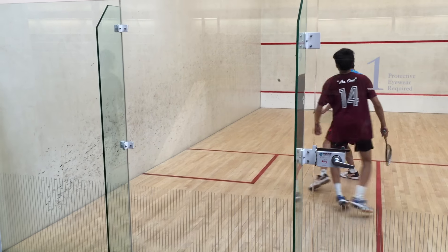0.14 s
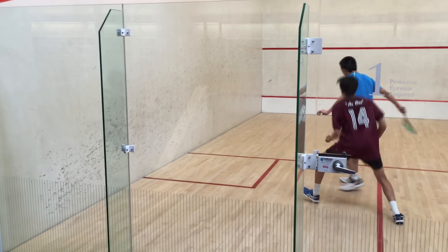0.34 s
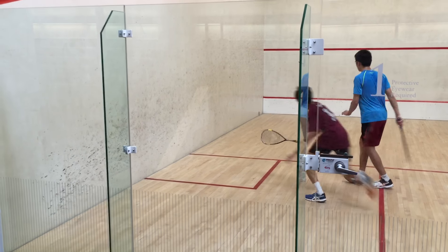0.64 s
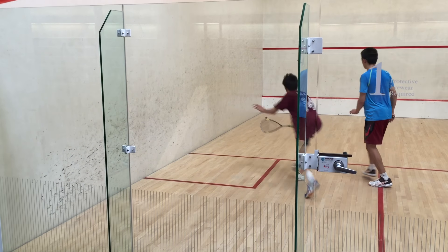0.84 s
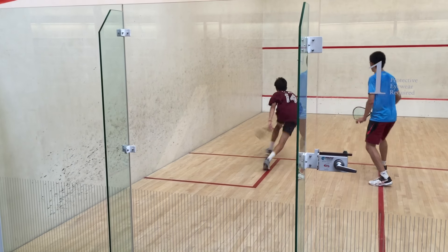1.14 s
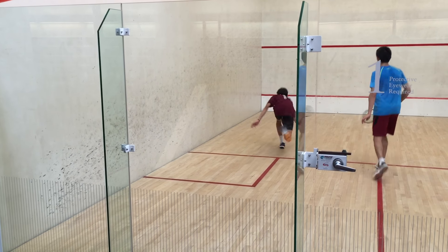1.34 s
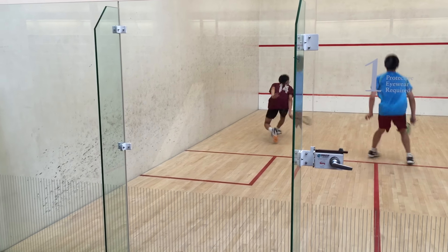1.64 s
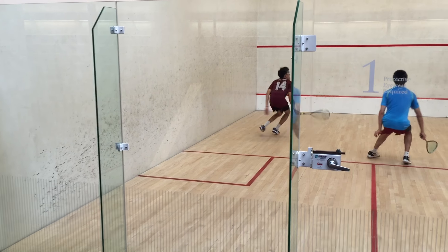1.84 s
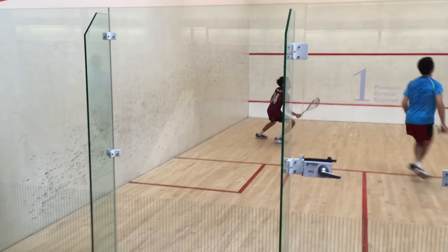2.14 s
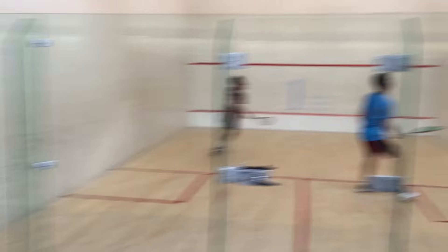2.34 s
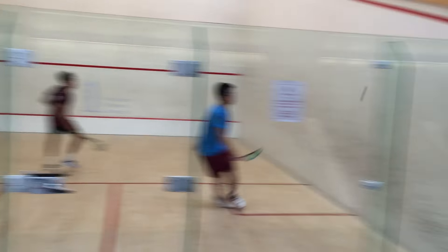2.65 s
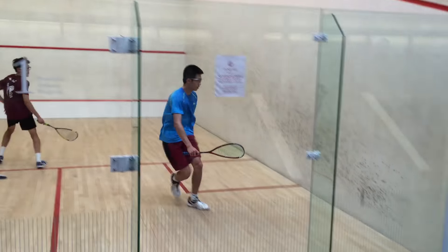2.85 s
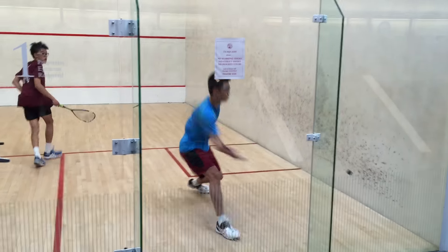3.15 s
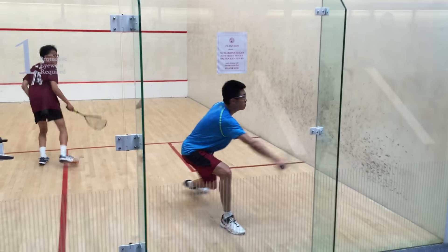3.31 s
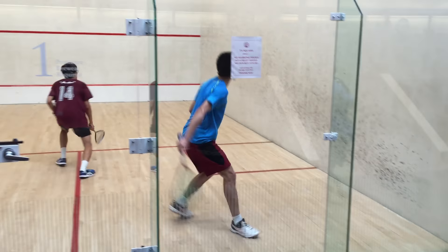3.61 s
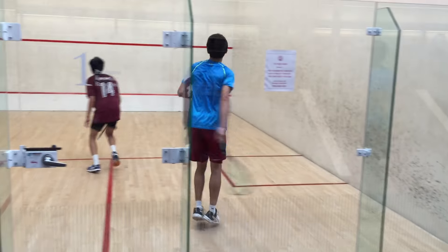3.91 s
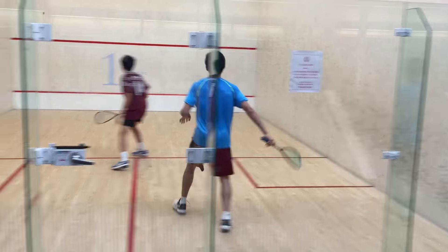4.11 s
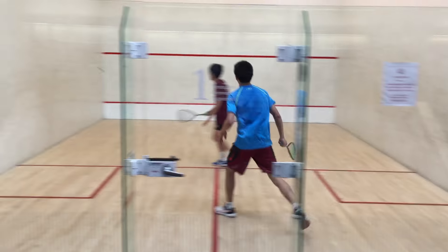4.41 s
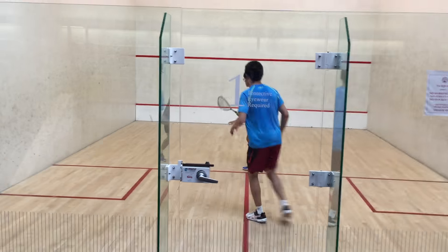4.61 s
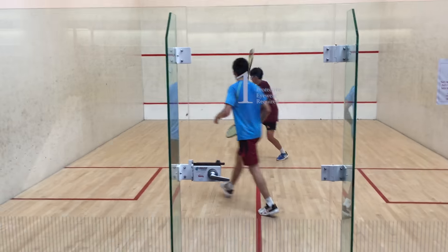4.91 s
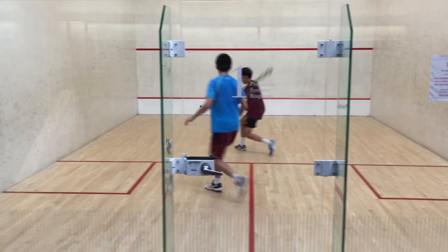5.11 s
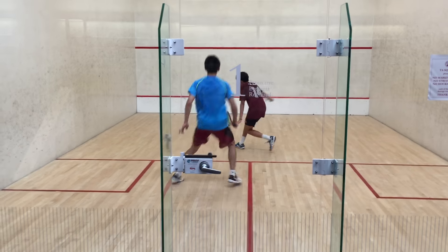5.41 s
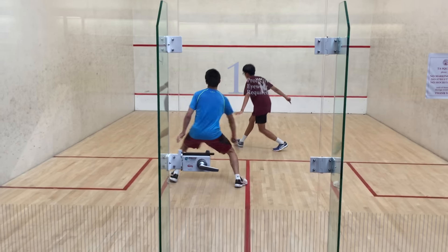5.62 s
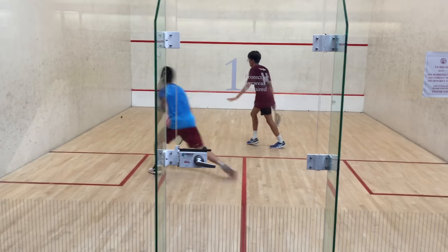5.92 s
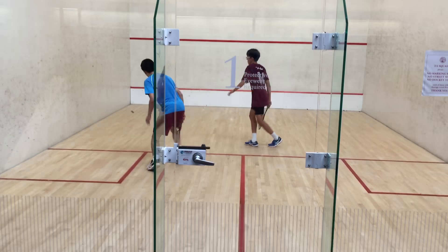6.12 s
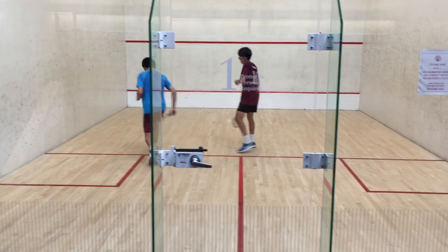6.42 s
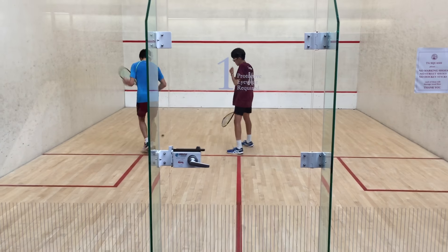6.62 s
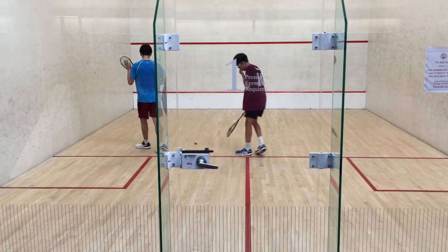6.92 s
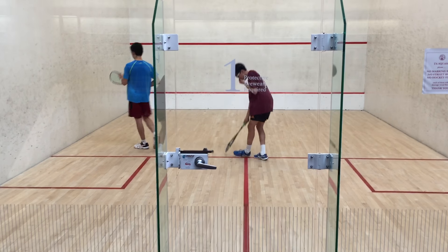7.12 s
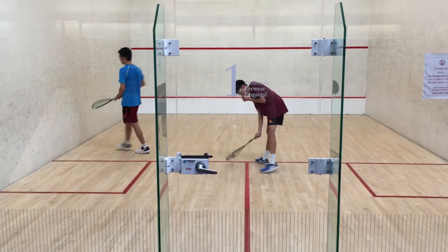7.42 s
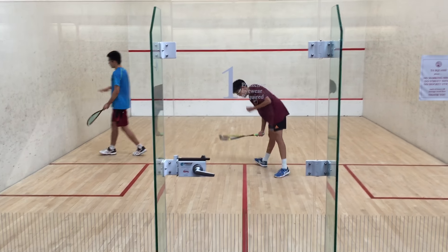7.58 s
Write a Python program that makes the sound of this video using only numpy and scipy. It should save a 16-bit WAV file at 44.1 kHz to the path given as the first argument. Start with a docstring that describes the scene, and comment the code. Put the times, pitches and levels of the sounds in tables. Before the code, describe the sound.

A short squash rally: four racquet hits and several hard wall smacks, each trailing nearly two seconds of echo. Between them come high, rough sneaker squeaks, quick light footfalls and deep floor thuds. A heavy lunge ends the play, steps calm down, faint scuffs pass, and a racquet taps the boards with a brief ring. The microphone stands outside the glass, with soft low air noise beneath.

```python
"""Racquets strike a squash ball and it smacks the front wall, heard from behind the glass back wall.
Each blow is a short coloured pulse with a brief ring, followed by the echoes of a hard court.
Rubber soles squeak as wavering tones with overtones; feet thud as low tones with rumbling boards.
Light scuffs are brief hisses, and a racquet's frame rings near the end as it scoops up the ball.
Ventilation murmurs underneath as steady coloured noise."""
import sys
import numpy as np
from scipy import signal
from scipy.fft import rfft, irfft, next_fast_len
from scipy.io import wavfile
from scipy.ndimage import map_coordinates

SR = 44100
rng = np.random.default_rng(int(sys.argv[2]) if len(sys.argv) > 2 else 0)


def inscribe(sig):
    """Save sig as 16-bit PCM at rate SR to the path in sys.argv[1].

    A 1-D sig is mono; a 2-D sig holds one channel per row.
    Samples are clipped to [-1, 1] before scaling.
    """
    pcm = np.round(np.clip(np.atleast_2d(sig).T, -1, 1) * 32767)
    wavfile.write(sys.argv[1], SR, pcm.astype(np.int16))


N = 341775  # length in samples


def amp(db):
    """Turn decibels into a plain multiplier."""
    return 10 ** (np.asarray(db) / 20)


def unit(x):
    """Scale a sound to an average (rms) strength of 1."""
    return x / np.sqrt(np.mean(x ** 2) + 1e-20)


def along(points, hz):
    """Read a (frequency, value) curve, with frequency spaced in octaves as the ear hears it."""
    frequencies, values = np.transpose(points)
    return np.interp(np.log(hz + 1), np.log(frequencies), values)


def clock(length):
    """The time in seconds of every sample."""
    return np.arange(int(length * SR)) / SR


def add(track, s, x):
    """Mix x into the track at time s."""
    start = max(0, round(s * SR))
    track[start:start + len(x)] += x[:max(0, N - start)]


def wobble(t, rate):
    """A smooth random curve with this many random points a second."""
    return map_coordinates(rng.standard_normal(512), [t * rate], mode="wrap")


def noise(spectrum, size):
    """Random hiss, coloured by a spectrum and scaled to strength 1."""
    hz = np.fft.rfftfreq(size, 1 / SR)
    coloured = rfft(rng.standard_normal(size)) * amp(along(spectrum, hz))
    return unit(irfft(coloured, size))


def blow(spectrum, tilt_db=0, thump_db=0, thump_hz=480, size=4096):
    """A knock: one pulse of energy 1 with the given colour, its energy packed towards the start."""
    hz = np.fft.rfftfreq(size, 1 / SR)
    tilt = tilt_db * np.log2(hz / 1000 + 0.081)
    thump = thump_db / (1 + (hz / thump_hz) ** 4)
    # folding the cepstrum forward in time keeps the colour but lets nothing sound before the hit
    cepstrum = irfft(np.log(amp(along(spectrum, hz) + tilt + thump)))
    cepstrum[1:size // 2] *= 2
    cepstrum[size // 2 + 1:] = 0
    pulse = irfft(np.exp(rfft(cepstrum)))
    return pulse / np.linalg.norm(pulse)


def ringing(hz, t60, size=4096):
    """One pure tone of energy 1 that dies away by 60 dB in t60 seconds."""
    t = np.arange(size) / SR
    mode = np.sin(2 * np.pi * hz * t) * 10 ** (-3 * t / t60)
    return mode / np.linalg.norm(mode)


# how long the court's echo lasts: (frequency [Hz], time to fall by 60 dB [s])
ECHO_TIMES = [(60, 0.89), (130, 2.3), (260, 1.83), (700, 1.67), (1900, 1.794), (4300, 1.757), (6500, 1.23),
              (9000, 0.99), (15000, 0.39)]
ROUND_TRIP = 0.0614  # s, from the back glass to the front wall and back


def court(x, direct_db, build=0.013, merge=0.06, early_db=-10, flutter=1.0, smear=0.011,
          scatter=0.0012, contact=0.0029, shade_hz=7000):
    """Sound from one spot arrives directly, then by scattered walls, then as a tail sloshing end to end."""
    t = clock(2.4)
    hz, frames, z = signal.stft(rng.standard_normal(len(t)), SR, nperseg=256)
    fade = 10 ** (-3 * frames / along(ECHO_TIMES, hz)[:, None])
    tail = signal.istft(z * fade, SR, nperseg=256)[1][:len(t)]
    # each return of the wavefront along the court is weaker than the one before
    returns = 0
    for k in range(1, 4):
        since_return = t - k * ROUND_TRIP - smear / 2
        returns = returns + flutter / k ** 2 * np.exp(-(since_return / smear) ** 2)
    late = amp(-39.0) * tail * (1 - np.exp(-t / build)) * (1 + returns)
    # side walls, floor and glass each send short smeared copies
    when, strength = rng.random(24), rng.exponential(size=24)
    delay = 0.0027 + 2 * merge * when
    arrivals = np.bincount((delay * SR).astype(int), strength * np.exp(-delay / merge), len(t))
    smeared = signal.lfilter([1], [1, -np.exp(-1 / (scatter * SR))], arrivals)
    early = smeared * rng.standard_normal(len(t))
    direct = np.exp(-t / contact) * rng.standard_normal(len(t))
    first = amp(early_db) * early / np.linalg.norm(early)
    first += amp(direct_db) * direct / np.linalg.norm(direct)
    # the glass wall shades the treble of these first arrivals
    shaded = signal.lfilter(*signal.butter(1, shade_hz, fs=SR), first)
    return signal.fftconvolve(x, late + shaded)


# colour of the moving air: (frequency [Hz], level [dB])
AIR_COLOUR = [(25, -16), (60, -3.5), (110, 8), (250, -4.5), (500, -29.5), (1500, -28.5), (4000, -32),
              (8000, -41), (15500, -45)]


def ventilation():
    """Moving air makes a steady random murmur, strongest in the bass."""
    return amp(-53.0) * noise(AIR_COLOUR, N)


# colour of rubber rubbing on the boards: (frequency [Hz], level [dB])
RUB_COLOUR = [(300, 4), (1200, 8), (3000, 0), (6000, 7.5), (9000, -3), (15000, -13)]
SAG = 0.033  # share of its pitch that a squeak loses as the sole slows


def squeak(length, hz, rough, overtone_db, waver=0.029, rasp=0.0794, flutter_db=3, fall_db=9,
           grit=0.65, skirt=0.1):
    """Rubber sticks and slips thousands of times a second; uneven grip roughens pitch and strength."""
    t = clock(length)
    glide = hz * (1 + SAG * (0.5 - t / length))
    slow_waver = waver * np.sqrt(rough) * wobble(t, 222.6)
    fast_rasp = rasp * rough * wobble(t, 1102.0)
    pitch = glide * (1 + slow_waver + fast_rasp)
    phase = 2 * np.pi * np.cumsum(pitch) / SR
    # sharp releases make overtones, which come and go with the grip
    overtones = 0
    for k in range(2, 5):
        if k * hz < SR / 2:
            level = amp(overtone_db - fall_db * (k - 2.5)) * (1 + 0.12 * wobble(t, 1380))
            overtones = overtones + level * np.sin(k * phase)
    chatter = 1 + grit * rough * wobble(t, 1195) + skirt * wobble(t, 2600)
    grip = signal.windows.tukey(len(t), 0.5) * amp(flutter_db * wobble(t, 136.5))
    rub = amp(-17.0) * rough * noise(RUB_COLOUR, len(t))
    return unit(((np.sin(phase) + overtones) * chatter + rub) * grip)


# soles slipping: (time of the slide [s], lead of the first catch [s], length [s], pitch [Hz],
# level [dB], roughness [0-1], overtones [dB])
SOLE_SLIPS = [ (0, 0, 0.017, 3734, -33.5, 0.78, -23.5), (0.12, 0.053, 0.032, 4000, -30, 0.71, -15),
              (0.118, 0.031, 0.032, 3240, -33, 0.52, -11), (0.414, 0.0028, 0.026, 4310, -34.5, .25, -4),
              (0.437, 0.041, 0.054, 4714, -27.5, 0.23, -14.5), (0.704, 0, .13, 3154, -39, 0.27, -23),
              (0.758, 0.004, .04, 5304, -40.5, .4, -25), (1.83, .035, 0.034, 4297, -27.5, 0.49, -16.5),
              (1.864, 0.023, 0.057, 3425, -28, 0.51, -14.5), (2.131, 0.0016, 0.027, 4880, -32.5, 0.35, -10),
              (2.987, 0.045, 0.038, 3228, -30, .85, -9.5), (2.998, 0.04, 0.032, 5120, -31, 0.38, -15),
              (3.109, 0, 0.12, 5135, -31.5, 0.53, -14.5), (3.113, 0.023, 0.1, 4555, -35, 0.35, -6),
              (3.58, 0.052, 0.0665, 4852, -26, 0.27, -14), (3.6, 0.0029, 0.057, 4250, -41.5, .35, -8),
              (4.259, 0.022, 0.061, 4075, -23, .28, -15), (5.676, .02, .11, 3270, -40, 0.48, -20),
              (5.951, .021, 0.079, 4162, -29.5, 0.15, -18), (5.972, 0, 0.079, 4520, -36.5, 0.49, -16.5),
              (6.637, 0, .059, 4502, -40.5, 0.31, -12), (7.705, 0.009, 0.069, 4880, -52, 0.24, -1)]
CATCH_S, CATCH_DB = 0.0211, -3.5  # chirp as the sole first grips: length, level against the slide


def squeaks():
    """A braking sole catches with a short chirp, then slides."""
    out = np.zeros(N)
    for s, lead, length, hz, db, rough, overtone_db in SOLE_SLIPS:
        catch = (s - lead, CATCH_S, db + CATCH_DB)
        slide = (s, length, db)
        for start, span, level_db in [catch, slide]:
            slip = squeak(span, hz, rough, overtone_db)
            heard = court(slip, direct_db=-6.5, build=0.0073, early_db=-14, flutter=0.047)
            add(out, start, amp(level_db) * heard)
    return out


# colour of a sole slapping the boards: (frequency [Hz], level [dB])
SOLE_COLOUR = [(150, 6), (380, -6), (620, -9), (1150, -8), (2500, -15.5), (6000, -29), (15000, -63)]


def footfall(hz, slap_db, ring=0.069, boards_t60=0.33, boards_db=-2, near_db=-5, room_db=-7):
    """A foot pushes the sprung floor into a low tone, the boards shudder, and the sole slaps."""
    t = clock(0.31)
    push = np.sin(2 * np.pi * hz * t) * 10 ** (-3 * t / ring)
    # rumble centred on the boards' own pitch
    rumble = [(hz / 4, -34), (hz * 0.73, -3), (hz, 0), (hz * 1.54, -6), (hz * 2.61, -26), (hz * 20, -80)]
    shudder = amp(boards_db) * noise(rumble, len(t)) * 10 ** (-3 * t / boards_t60)
    thud = (push + shudder) * (1 - np.exp(-t / 0.0057))
    airborne = amp(room_db) * thud
    slap = blow(SOLE_COLOUR, thump_db=1)
    airborne[:len(slap)] += amp(slap_db) * slap
    heard = court(airborne, direct_db=-25, build=0.028, early_db=-7.0)
    heard[:len(t)] += amp(near_db) * thud  # the thud is also heard without echo
    return heard


# hard landings, heel first: (time [s], heel level [dB], forefoot level [dB], board pitch [Hz],
# slap of the sole [dB])
LANDINGS = [ (0.108, -32.5, -41, 115, 20), (.74, -36, -38, 74, 18), (1.149, -27.5, -37, 88, 19.5),
            (1.415, -15, -13, 87, 4.5), (1.803, -16.5, -8.5, 104, -5), (2.375, -20, -23, 84, 12),
            (2.68, -18, -20.5, 78.2, 7), (2.925, -28.5, -24, 85, 20.5), (3.24, -26, -27.5, 80.5, 19),
            (3.368, -24.5, -26, 66, 17.5), (3.799, -27, -28.5, 76, 14), (4.818, -32, -18, 116, 14.5),
            (5.147, -36, -44, 76, 8), (5.615, -29, -27.5, 105, 25.5), (5.983, -14, -15, 101, -6),
            (6.495, -25, -25.5, 68, 14), (7.221, -36, -57, 85, 14)]
ROLL_S, HEEL_PITCH = 0.049, 0.94  # time from heel to forefoot; heel pitch as a ratio to the forefoot's


def steps():
    """Each landing rolls from a deep heel thud onto the forefoot."""
    out = np.zeros(N)
    for s, heel_db, forefoot_db, hz, slap_db in LANDINGS:
        add(out, s, amp(heel_db) * footfall(hz * HEEL_PITCH, slap_db))
        add(out, s + ROLL_S, amp(forefoot_db) * footfall(hz, slap_db))
    return out


# how both players' light steps rise and fall, before a shared boost: (time [s], level [dB])
LIGHT_STEPS = [(0.0, -56), (0.47, -45), (1.47, -43.5), (1.62, -36.5), (3.56, -40.5), (4.75, -52),
               (5.03, -37.5), (5.42, -55), (6.22, -42), (6.67, -40.5), (6.84, -53), (7.75, -59)]
STEP_GAP_S = 0.19  # average time between light steps


def shuffle(boost_db=12.5, hz=88, slap_db=2, spread_db=1.5, pitch_spread=0.22, stagger_s=0.03):
    """The players patter about on their toes: light footfalls of uneven timing, weight and pitch."""
    out = np.zeros(N)
    beats = np.arange(STEP_GAP_S, N / SR, STEP_GAP_S)
    variations = rng.standard_normal((len(beats), 3))
    for s, (late, weight, board) in zip(beats, variations):
        level_db = np.interp(s, *np.transpose(LIGHT_STEPS)) + boost_db + spread_db * weight
        step = footfall(hz * np.exp(pitch_spread * board), slap_db)
        add(out, s + stagger_s * late, amp(level_db) * step)
    return out


# racquet meets ball: (time [s], level [dB], brightness [dB per octave], thump [dB],
# direct sound [dB], string pitch [Hz])
RACQUET_STROKES = [(.243, 4.5, 1.5, 5.5, -22, 1114), (1.412, 2.5, 1.4, 10, -21.5, 1175),
                   (3.423, 5, -0.5, 6.5, -12.5, 910), (5.461, -1.5, 1, 7, -26, 1270)]
# colour of the racquet's blow: (frequency [Hz], level [dB])
RACQUET_COLOUR = [(60, -21), (170, -2), (350, -1), (480, -2), (620, -9), (780, -2.5), (930, -6),
                  (1300, -6.5), (2300, -13.5), (4500, -17.5), (8500, -25.5), (11000, -31.5), (15500, -34.5)]


def racquets():
    """Each stroke is a dull pock with a brief ring of strings."""
    out = np.zeros(N)
    for s, db, tilt_db, thump_db, direct_db, string_hz in RACQUET_STROKES:
        hit = blow(RACQUET_COLOUR, tilt_db, thump_db)
        pock = court(hit, direct_db, build=0.023, early_db=-12.5, flutter=0.16)
        ring = ringing(string_hz, t60=0.036)
        strings = court(ring, direct_db, build=0.018, early_db=-5, flutter=0.19)
        add(out, s, amp(db) * (pock + amp(-12.0) * strings))
    return out


# ball meets wall: (time [s], level [dB], brightness [dB per octave], thump [dB], direct sound [dB])
WALL_SMACKS = [(.508, 10, 0.34, 2, -8.5), (1.656, 9.5, 0, -7, -10.5), (3.472, 8, 1, 4.5, -12.5),
               (4.221, -4, 3, 12.5, -5.5), (5.724, 4.5, 0.5, 6, -9)]
# colour of the blow on the wall: (frequency [Hz], level [dB])
WALL_COLOUR = [(60, -19), (180, 2.5), (320, 4.5), (480, -2), (640, -7), (820, -4), (1050, -2.5), (2100, -4),
               (4000, -12), (6500, -18.5), (9000, -22), (10500, -25), (15500, -23)]


def walls():
    """The ball cracks against the plaster, its hollow shell pops, and the court fills."""
    out = np.zeros(N)
    for s, db, tilt_db, thump_db, direct_db in WALL_SMACKS:
        hit = blow(WALL_COLOUR, tilt_db, thump_db)
        crack = court(hit, direct_db, build=0.029, early_db=-11.0, flutter=0.33, contact=0.024)
        shell = ringing(hz=1076, t60=0.024)
        pop = court(shell, direct_db, build=0.0086, early_db=-20.5, flutter=0.43)
        add(out, s, amp(db) * (crack + amp(-11.5) * pop))
    return out


# light scuffs: (time [s], length [s], level [dB])
LIGHT_SCUFFS = [(6.464, 0.1, -60), (7.065, 0.1, -58)]
# colour of a scuff: (frequency [Hz], level [dB])
SCUFF_COLOUR = [(3000, -8), (7000, -14), (11000, -2), (15500, -2)]


def scuffs():
    """Something brushes lightly over the boards with a high hiss that swells and fades."""
    out = np.zeros(N)
    for s, length, db in LIGHT_SCUFFS:
        size = int(length * SR)
        brush = unit(noise(SCUFF_COLOUR, size) * np.hanning(size))
        add(out, s, amp(db) * court(brush, direct_db=-3.0))
    return out


# colour of the racquet frame knocking the boards: (frequency [Hz], level [dB])
FRAME_COLOUR = [(60, 12), (140, 13), (300, -2.5), (450, -8), (690, -13), (850, -3), (1050, -7), (1300, -10),
                (1600, -7.5), (2200, -9.5), (4000, -19), (6500, -31.5), (15500, -65)]
# tones of the ringing frame: (frequency [Hz], time to fall by 60 dB [s], level [dB])
FRAME_TONES = [(865, 0.11, -24), (1300, 0.033, -12.5), (1860, 0.021, -14.5)]


def scoop(s=7.375, db=-2):
    """After the rally a racquet knocks the boards to scoop up the ball, and its frame rings."""
    out = np.zeros(N)
    knock = court(blow(FRAME_COLOUR), direct_db=-19, build=0.011, early_db=-10, flutter=1.0)
    tones = sum(amp(level_db) * ringing(hz, t60) for hz, t60, level_db in FRAME_TONES)
    frame = court(tones, direct_db=-25, build=0.022, early_db=-13, flutter=1.0)
    add(out, s, amp(db) * (knock + frame))
    return out


# pitches at which floor, panels and glass resonate: (frequency [Hz], width [Hz], level [dB])
PANEL_TONES = [(73, 3.5, -12.5), (266, 23, -4.5), (341, 42, -9), (1036, 31, -24), (1540, 21, -14),
               (1870, 47, -7)]


def panels(x):
    """Floor, wall panels and glass answer every ball, racquet and foot sound at their own pitches."""
    out = x.copy()
    for hz, width, db in PANEL_TONES:
        out += amp(db) * signal.lfilter(*signal.iirpeak(hz, hz / width, fs=SR), x)
    return out


def scene():
    """Ball, racquets and feet sound through the court's panels, over the ventilation."""
    feet = squeaks() + amp(-1) * steps() + shuffle() + scuffs()
    play = racquets() + walls() + scoop()
    return (panels(feet + play) + ventilation())[None]


def record(dry):
    """Filters thin out the deepest bass and remove everything above a sharp upper limit."""
    top_hz = 15800
    thin = signal.sosfilt(signal.butter(5, 44, "highpass", fs=SR, output="sos"), dry)
    size = next_fast_len(N + SR)
    kept = np.fft.rfftfreq(size, 1 / SR) < top_hz
    return irfft(rfft(thin, size) * kept, size)[:, :N]


dry = scene()
out = record(dry)
inscribe(out)
```